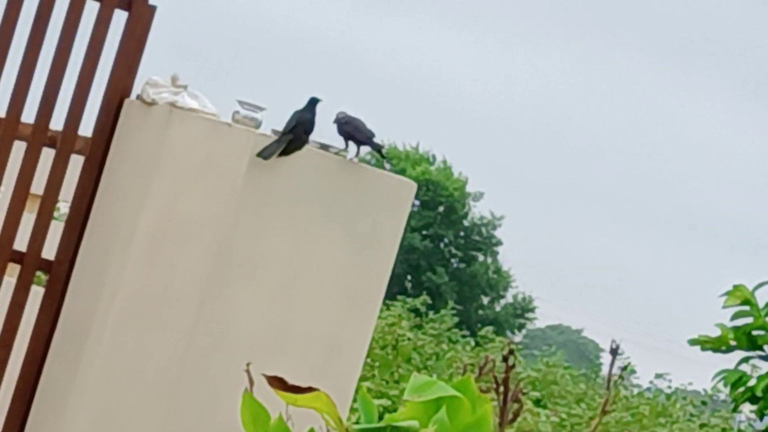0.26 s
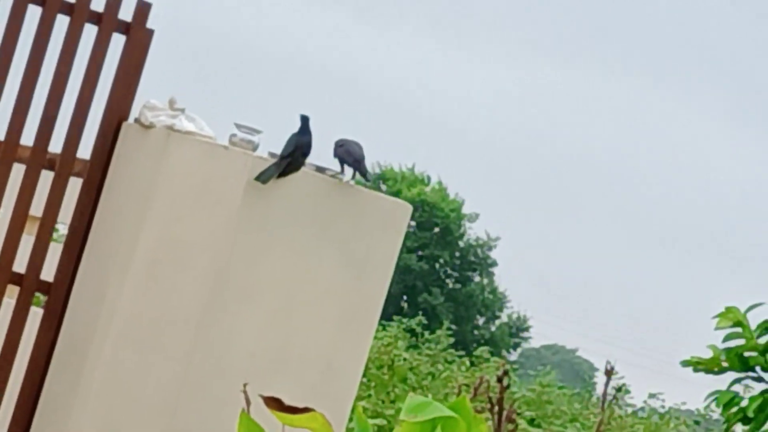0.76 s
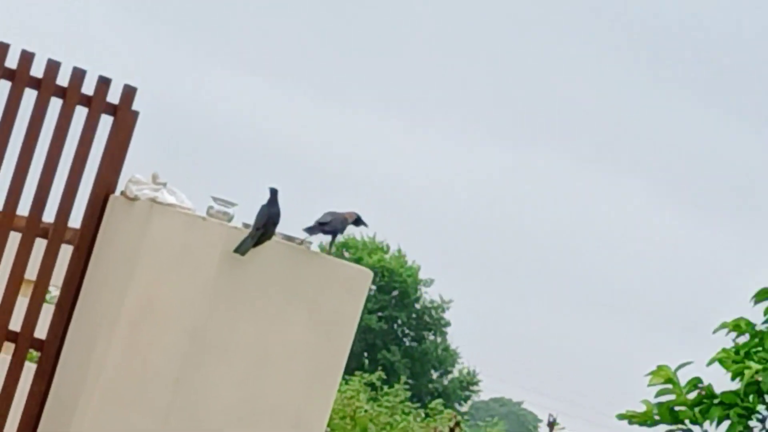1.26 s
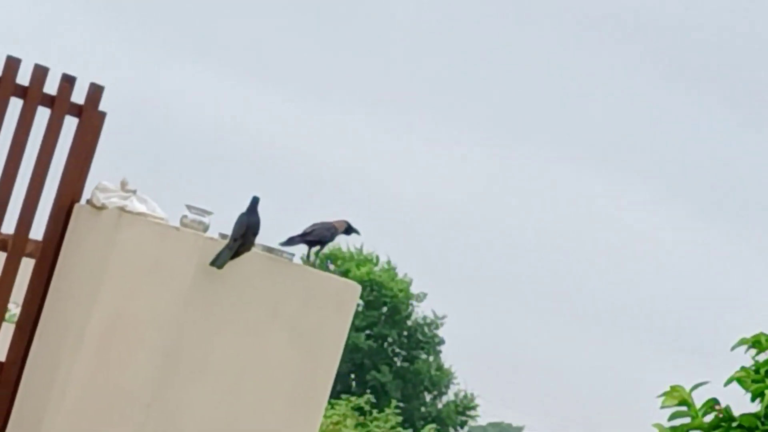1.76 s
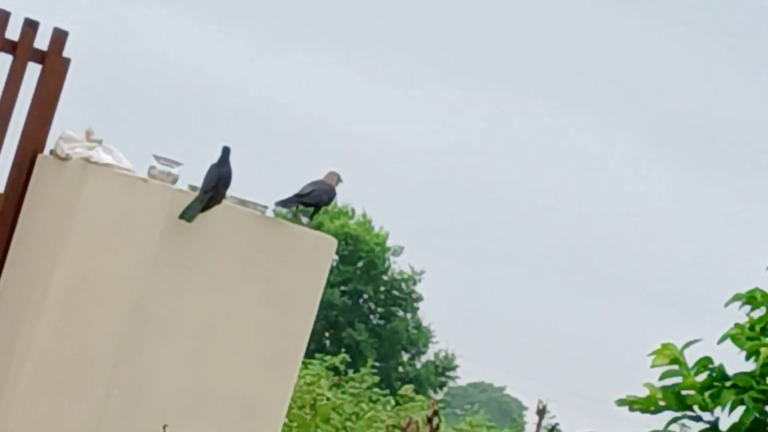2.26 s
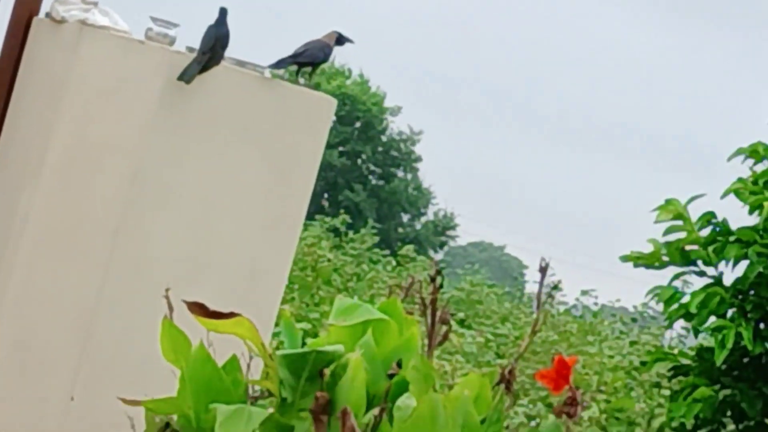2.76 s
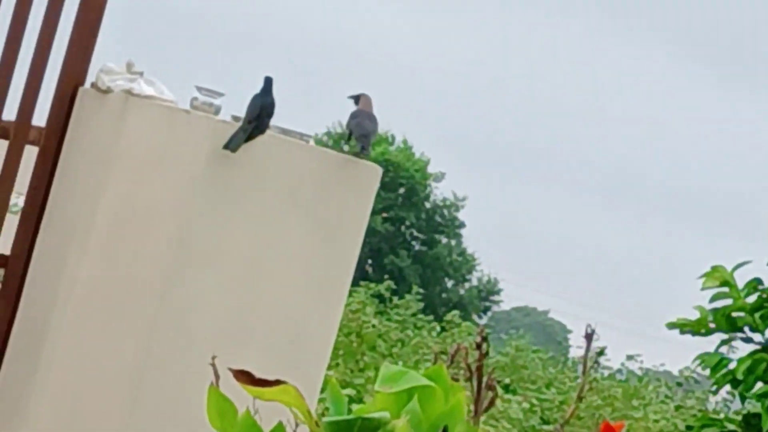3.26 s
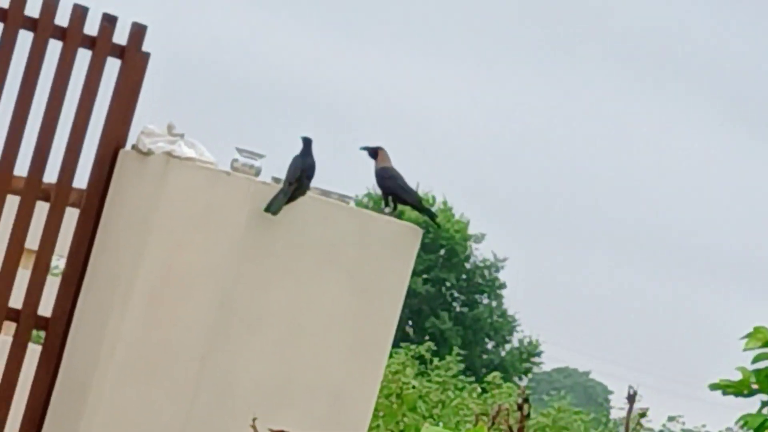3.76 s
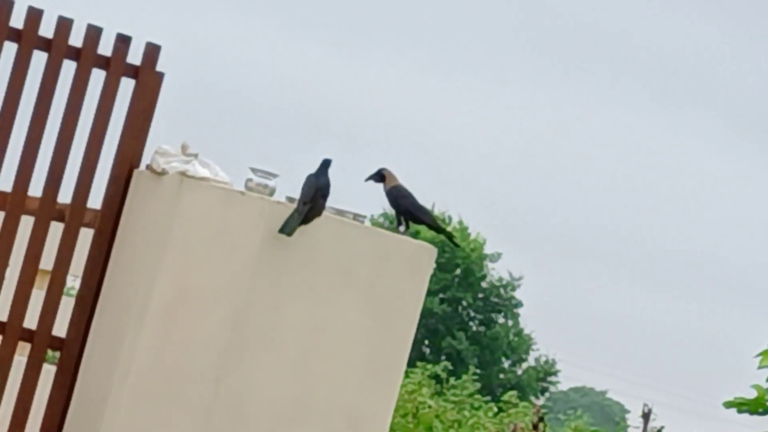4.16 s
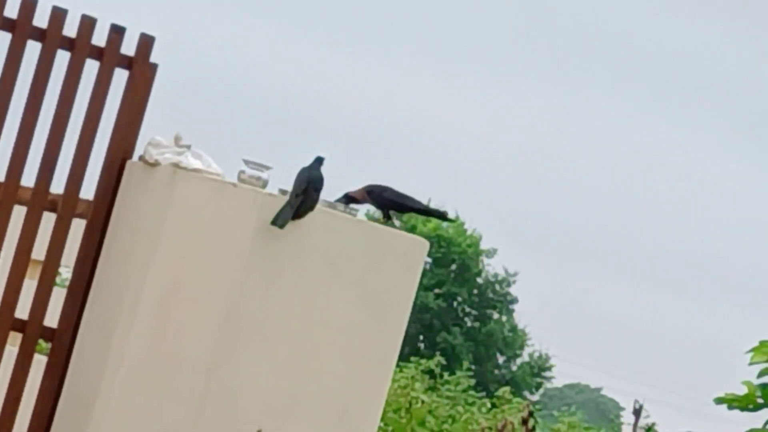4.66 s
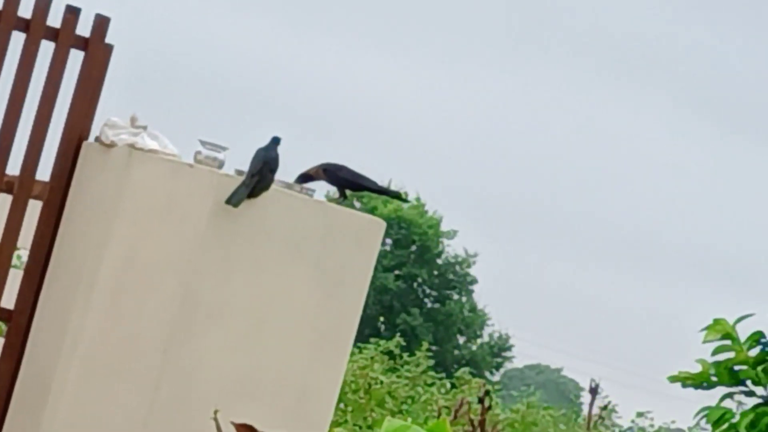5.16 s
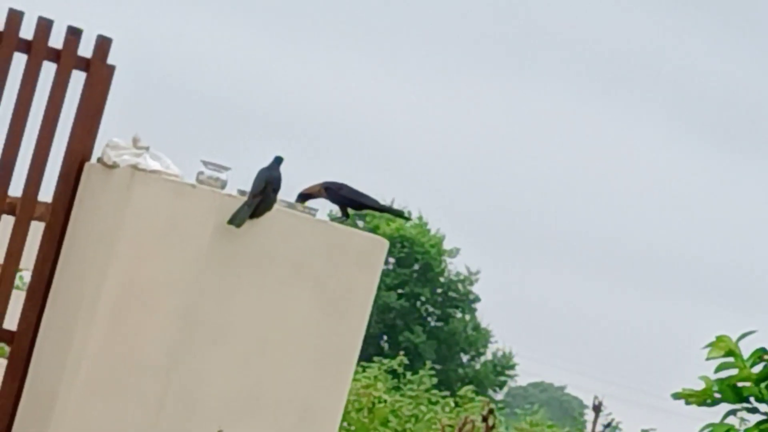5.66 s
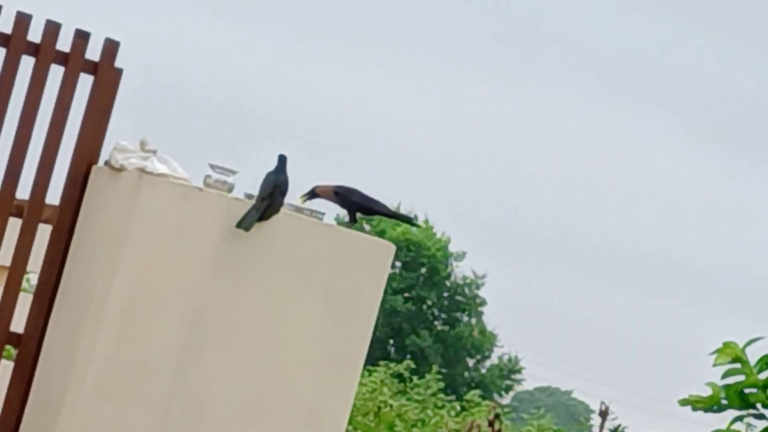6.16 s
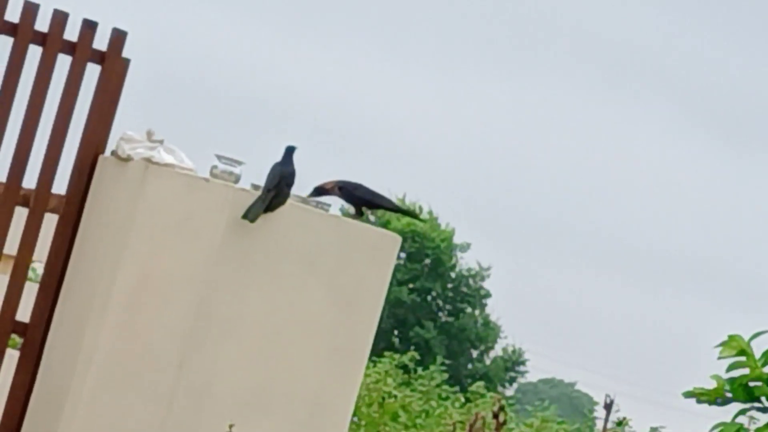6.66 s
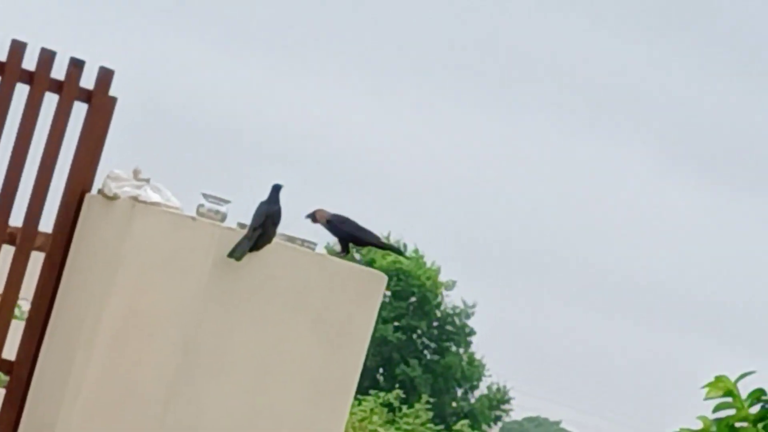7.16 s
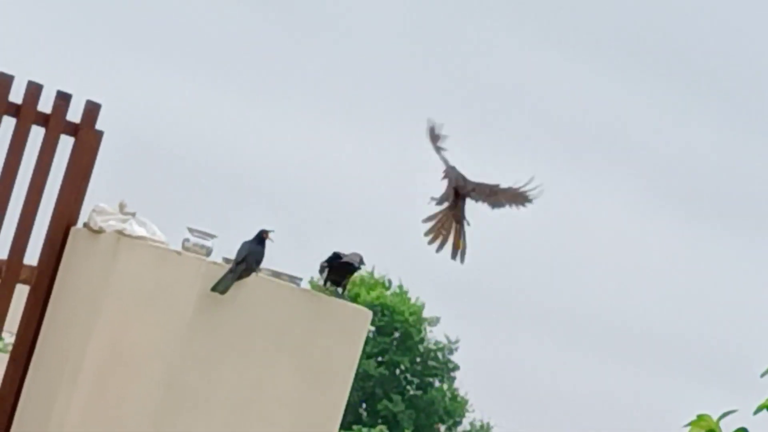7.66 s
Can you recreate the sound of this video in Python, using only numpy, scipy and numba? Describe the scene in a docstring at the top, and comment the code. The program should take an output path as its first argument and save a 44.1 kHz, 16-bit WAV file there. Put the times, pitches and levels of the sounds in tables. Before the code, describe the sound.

Outdoors, wind buffets the microphone in uneven low thumps while crows trade raspy and throaty caws. The calls bunch together midway as the wind drops, then thin out. A small bird gives one sharp chirp, and a last burst of hoarse cawing and short squawks follows. Faint whistles and thin insect trills sit in the distance, and the garden background dips whenever the crows and wind rest.

```python
"""Crows in a windy garden

Several crows caw, some throaty, some hoarse and hissing, often overlapping. Their breath makes skin in
the voice box slap, and the throat, mouth and bill ring with it. Gusts buffet the microphone with a low
rumble; small birds whistle and insects trill with their wings further off. The recorder's noise gate
turns the garden down whenever wind and crows rest."""
import sys
import numpy as np
from scipy import signal
from scipy.fft import rfft, irfft, next_fast_len
from scipy.io import wavfile
from scipy.ndimage import uniform_filter1d, minimum_filter1d
from numba import njit

SR = 44100
rng = np.random.default_rng(int(sys.argv[2]) if len(sys.argv) > 2 else 0)


def unload_wav(signal):
    """Save mono or channel-first audio to the path in sys.argv[1] as 16-bit WAV at rate SR, clipped to [-1, 1]."""
    wavfile.write(
        sys.argv[1],
        SR,
        np.round(np.clip(np.atleast_2d(signal).T, -1, 1) * 32767).astype(np.int16),
    )


N = 348831
T = np.arange(N) / SR

# tone of air fluttering on the microphone: f/Hz, level/dB
FLUTTER_SHAPE = [(60, -29.5), (150, 9), (290, 6.5), (430, -3), (620, -17), (1000, -37), (2000, -54),
                 (8000, -80.5)]


def voice_box(cycles, slap_share):
    """Thin skin slaps unevenly, every second slap weaker, and chops the stream of breath."""
    turn = cycles.astype(int)
    size = undb(1.2 * rng.standard_normal(512)[turn % 512] - 3 * (turn % 2))
    slaps = np.diff(turn, prepend=0) * size
    air = (2 + np.exp(-(cycles % 1) / 0.69)) * rng.standard_normal(SR)[:len(cycles)]
    return unit(slap_share * unit(slaps - slaps.mean()) + unit(air))


def throat_tone(source, cycles, hz, clear, overtone_gap_hz, overtone_share):
    """The throat rings at five times the slap rate; clear (0-1) favours pure tone over rough ringing."""
    # strong and weak cycles take turns, which adds a rough tone just above and below
    tone = np.sin(2 * np.pi * 5 * cycles) * (1 + 0.17 * np.cos(np.pi * cycles))
    # a neighbouring overtone beats against the first and roughens the caw
    overtone_hz = (hz + overtone_gap_hz) * (1 + 0.021 * wander(len(hz), 600))
    tone = np.sqrt(1 - overtone_share) * tone + np.sqrt(overtone_share) * sine(overtone_hz)
    ring = resonate(resonate(source, hz, 110.), hz, 970.)
    return steady(np.sqrt(clear) * unit(tone) + np.sqrt(1 - clear) * unit(ring))


def mouth_tone(source, glide, mouth_hz, gape):
    """The bill opens wide early in the call, so the mouth rings high and then slides down."""
    # tone of the open mouth: f/mouth_hz, level/dB
    mouth_shape = [(0.181, -42.5), (0.329, -14), (0.449, -18), (0.679, -0.5), (0.998, -3), (1.222, -21.5),
                   (1.797, -25.5), (2.9, -40), (3.999, -38), (5.5, -40)]
    t = np.arange(len(source)) / SR
    opening = gape * np.exp(-((t - .045) / 0.044) ** 2)
    centre = mouth_hz * (1 + opening) * glide ** 0.5
    ring = 0.39 * (1 + 1.8 * opening) * resonances(source, [(0.97, 980, 0)], centre)
    return steady(unit(colour(source, mouth_shape, mouth_hz)) + ring) * (1 + 1.1 * opening)


def caw(hz, attack, release, clear, overtone_gap_hz, overtone_share, throat_db, mouth_hz, gape,
        mouth_db, rasp_db, hiss_db, pipe_db, pipe_hz=5000, throb_db=0):
    """One caw: rough pulses ring the throat, mouth, bill and windpipe, which glide with the pitch hz."""
    # where the bill rings at the top of the glide: f/Hz, width/Hz, level/dB
    bill_rings = [(2120, 2700, 3.5), (3184, 1400, 4.5), (3797, 620, -1), (4486, 700, -4.5),
                  (4973, 230, -12.5)]
    # where the windpipe rings: f/pipe_hz, width/Hz, level/dB
    pipe_rings = [(1, 1000, -2), (1.72, 1500, -12.5), (2.07, 1400, -14.5)]
    # tone of the hissing breath: f/Hz, level/dB
    hiss_shape = [(600, -20), (2200, -3), (3500, 12.5), (4600, 7), (7000, 5), (9500, -2.5), (11500, -10.5),
                  (15000, -19)]
    n, glide = len(hz), hz / hz.max()
    jitter = .03 * (1.1 - clear) * wander(n, 600)  # a clear voice is steadier
    cycles = np.cumsum(hz * (1 + jitter)) / 5 / SR  # running count of slaps
    source = voice_box(cycles, slap_share=0.55)
    throat = throat_tone(source, cycles, hz, clear, overtone_gap_hz, overtone_share)
    mouth = mouth_tone(source, glide, mouth_hz, gape)
    rasp = steady(resonances(voice_box(cycles, slap_share=.35), bill_rings, glide ** 0.33))
    rasp *= undb(2 * wander(n, 24))
    pipe = unit(resonances(voice_box(cycles, slap_share=0.22), pipe_rings, pipe_hz * glide ** 0.54))
    hiss = unit(colour(voice_box(cycles, slap_share=0.056), hiss_shape))
    effort = swell(np.arange(n) / SR, n / SR, attack, release)
    throb = undb(throb_db * np.tanh(wander(n, rate=70)))
    voice = undb(throat_db) * throat * throb ** .5
    voice += throb * (undb(mouth_db) * mouth + undb(rasp_db) * rasp)
    # hiss grows faster with effort than the voice does; the windpipe rings from the start
    return effort * voice + effort ** 1.5 * undb(hiss_db) * hiss + effort ** 0.32 * undb(pipe_db) * pipe


def arched(length, top_hz, arch, crest):
    """Pitch that climbs to its top, at the share crest of the length, then sags a little."""
    progress = np.arange(int(length * SR)) / SR / length
    past_crest = np.interp(progress, [0, crest, 1], [-1, 0, 1])
    return top_hz * (1 - arch * np.abs(past_crest) ** 1.8 * np.where(past_crest < 0, 1.15, .44))


def bounced(voice, lag_s, share=0.24):
    """A call and its bounce off the wall, which makes it sound hollow."""
    lag = int(lag_s * SR)
    return (np.pad(voice, (0, lag)) + share * np.pad(voice, (lag, 0))) / (1 + share ** 2)


def hoarse_caws():
    """Breathy, hissing caws that share one rough voice."""
    # the caws: t/s, length/s, attack/s, top pitch/Hz, arch/share, throat/dB, mouth/dB, rasp/dB, hiss/dB
    calls = [ (0.847, 0.45, 0.1, 1483, 0.16, -37.5, -67, -40, -37.5),
             (1.887, 0.47, 0.2, 1520, 0.095, -33.5, -52, -35.5, -31),
             (2.871, 0.33, 0.13, 1483, 0.17, -37.5, -45.5, -46.5, -73),
             (3.154, 0.35, 0.14, 1467, 0.19, -40.5, -62, -39, -41),
             (4.222, 0.39, 0.15, 1358, .25, -40.5, -45, -45.5, -75),
             (5.001, 0.44, 0.082, 1490, 0.056, -37, -59.5, -41, -42.5),
             (7.49, 0.55, 0.2, 1529, 0.25, -39.5, -46.5, -38.5, -63),
             (7.58, 0.41, 0.2, 1495, 0.097, -45, -59, -45, -40.5)]
    out = np.zeros(N)
    for start, length, attack, hz, arch, throat_db, mouth_db, rasp_db, hiss_db in calls:
        voice = caw(arched(length, hz, arch, crest=.5), attack, release=0.13, clear=.25,
                    overtone_gap_hz=0, overtone_share=0, throat_db=throat_db, mouth_hz=3550, gape=.04,
                    mouth_db=mouth_db, rasp_db=rasp_db, hiss_db=hiss_db, pipe_db=rasp_db - 24)
        add(out, start, bounced(voice, lag_s=0.0046))
    return out


def throaty_caws():
    """Full, throbbing caws from several perches, each with its own voice."""
    # the caws: t/s, length/s, loudest point/share of length, clearness/0-1, gap to next overtone/Hz,
    # that overtone/share, throat/dB, mouth/Hz, gape/share, mouth/dB, rasp/dB, windpipe/Hz
    calls = [ (1.577, 0.52, 0.44, 0.51, -180, .5, -27, 2520, 0.43, -31, -55.5, 5400),
             (4.403, 0.43, 0.39, 0.79, 188, 0.23, -29.5, 2120, 0.043, -35, -59.5, 5800),
             (4.887, 0.44, 0.48, 0.43, -290, 0.055, -29, 2520, 0.4, -33, -56.5, 5200),
             (5.524, 0.31, 0.41, 0.7, -5, 0.046, -42.5, 3467, 0.014, -54, -57, 5370),
             (6.404, 0.36, 0.65, .55, 150, 0, -33.5, 2320, 0.34, -36, -56, 5860)]
    # the throat's pitch, one curve for each caw: t/s, f/Hz
    pitches = [
        [(1.58, 1246), (1.65, 1398), (1.78, 1572), (2.0, 1438), (2.09, 1310)],
        [(4.47, 1176), (4.56, 1490), (4.73, 1284), (4.78, 1120)],
        [(4.89, 1301), (4.95, 1506), (5.13, 1556), (5.34, 1416)],
        [(5.53, 1150), (5.66, 1404), (5.79, 1325)],
        [(6.42, 1079), (6.65, 1248), (6.78, 1087)],
    ]
    out = np.zeros(N)
    for (start, length, crest, *throat_and_mouth, rasp_db, pipe_hz), pitch in zip(calls, pitches):
        hz = curve(pitch)[int(start * SR):int((start + length) * SR)]
        attack, release = crest * length, 0.86 * (1 - crest) * length
        voice = caw(hz, attack, release, *throat_and_mouth, rasp_db, hiss_db=rasp_db - 14.5,
                    pipe_db=rasp_db - 6, pipe_hz=pipe_hz, throb_db=2.5)
        add(out, start, bounced(voice, lag_s=.0022))
    return out


def squawks():
    """Short, bright squawks at the end, as another crow swoops in."""
    # the squawks: t/s, mouth level/dB
    calls = [(7.584, -34), (7.689, -31.5), (7.79, -35.5)]
    hz = arched(length=0.093, top_hz=1420, arch=0.0508, crest=0.76)
    out = np.zeros(N)
    for start, db in calls:
        voice = caw(hz, attack=0.027, release=0.033, clear=0.59, overtone_gap_hz=0, overtone_share=0,
                    throat_db=db - 14, mouth_hz=4180, gape=0, mouth_db=db,
                    rasp_db=db - 9, hiss_db=db - 17, pipe_db=db - 31)
        add(out, start, voice)
    return out


def wind_level():
    """Strength of the wind in dB: each gust rises, holds and dies away over the breeze."""
    # the breeze on the microphone: t/s, level/dB
    breeze = [(0, -73), (1.1, -47), (2.75, -27.5), (3.3, -38.5), (4.1, -32), (4.6, -44), (5.0, -42.5),
              (5.12, -55), (5.7, -54), (6.52, -54), (6.7, -31.5), (7.9, -50)]
    # gusts on top of it: t/s, length/s, level/dB
    gusts = [(0.25, 0.25, -47), (0.509, 0.4, -31), (1.191, 0.24, -26), (1.53, 0.91, -20), (1.85, 0.29, -13),
             (2.481, 0.23, -23.5), (3.458, 0.17, -24), (5.92, 0.21, -49), (6.595, 0.61, -31.5),
             (6.742, 0.11, -22.5), (7.448, 0.13, -28), (7.69, 0.12, -34), (7.877, 0.13, -20)]
    power = undb(curve(breeze)) ** 2
    for start, length, db in gusts:
        power += (undb(db) * swell(T - start, length, attack=.05, release=.06)) ** 2
    return 10 * np.log10(power)


def buffets(pulse_s=0.0082, db_per_octave=24.5):
    """Single knocks of air on the microphone; harder ones are brighter."""
    # the knocks: t/s, strength/dB
    knocks = [(0.62, -24), (1.249, -26.5), (1.804, -15), (1.904, -10), (1.951, -14), (2.026, -12),
              (2.259, -15.5), (2.349, -14.5), (2.535, -21.5), (2.647, -18), (2.662, -20), (3.535, -27.5),
              (4.248, -36), (6.775, -24), (7.064, -23.5), (7.491, -32)]
    t = np.arange(SR // 10) / SR
    pulse = t / pulse_s * np.exp(1 - 2 * t / pulse_s)
    out = np.zeros(N)
    for start, db in knocks:
        brightness = 2 ** ((db + 11) / db_per_octave)
        burst = steady(colour(rng.standard_normal(len(t)), FLUTTER_SHAPE, brightness), size=400)
        add(out, start, undb(db + 7) * burst * pulse)
    return out


def wind(surge_db=5.5, ceiling=0.5):
    """Swirls of air thump the microphone; a harder gust makes them quicker and more fluttery."""
    # tone of the rumble, shifted down for soft wind and up for hard wind: f/Hz, level/dB
    rumble_shape = [(20, -36.5), (45, -16.5), (65, 1), (110, 1.5), (145, -4), (200, -12), (300, -28.5),
                    (500, -65.5), (1000, -73), (4000, -78.5)]
    gust_db = wind_level() + surge_db * np.tanh(wander(N, rate=19))
    force = np.clip((gust_db + 44) / 30, 0, 1)
    noise = rng.standard_normal(N)
    soft, hard = colour(noise, rumble_shape, 0.88), colour(noise, rumble_shape, 1.238)
    swirls = steady((1 - force) * soft + force * hard, size=2200)
    flutter = steady(colour(rng.standard_normal(N) * swirls ** 2, FLUTTER_SHAPE), size=4000)
    out = undb(gust_db - 1) * (swirls + undb(-27.5 + 22.9 * force ** 2) * flutter) + buffets()
    return ceiling * np.tanh(out / ceiling)  # the largest thumps flatten


def note(length, from_hz, to_hz, db, scratch=0.011):
    """A small bird's note: a quick glide, made scratchy by a fast wobble in pitch."""
    t = np.arange(int(length * SR)) / SR
    hz = to_hz + (from_hz - to_hz) * (1 - t / length) ** 1.1
    hz *= 1 + scratch * wander(len(t), 1700)
    return undb(db) * unit(sine(hz) * swell(t, length, 0.52 * length, 0.7 * length))


def whistle(length, hz, fall_per_s, db):
    """A note that starts above the pitch hz and ends below it."""
    fall = np.exp(fall_per_s * length / 2)
    return note(length, hz * fall, hz / fall, db)


def songbirds(far_count=22):
    """Falling whistles in the trees, fainter ones at random behind them, and scratchy chirps."""
    # the nearer whistles: t/s, length/s, f/Hz, fall/share of pitch per s, level/dB
    whistles = [(.275, .11, 2830, 2.4, -70), (1.402, .04, 4840, 3, -77), (0.611, 0.16, 3470, 1.1, -67.5),
                (0.753, 0.056, 2420, 3, -62.5), (0.788, 0.09, 3880, 3.2, -71),
                (1.306, 0.17, 2350, 2.2, -64.5), (2.303, 0.073, 2680, 0.57, -56),
                (2.542, 0.041, 2280, 4.2, -62), (2.726, 0.066, 2710, 0.76, -61.5),
                (2.817, 0.082, 4120, 1, -66.5), (6.021, 0.095, 3980, 0.25, -69.5),
                (7.064, .1, 3270, 2.7, -64)]
    # a sharp chirp close by that ends in a held whistle, then a faint scratchy call:
    # t/s, length/s, from/Hz, to/Hz, level/dB, scratch/share
    chirps = [(6.891, 0.035, 3300, 4660, -52, 0.14), (6.905, 0.049, 5920, 6820, -42, 0.072),
              (6.915, 0.13, 6170, 6060, -52, 0.0058), (7.011, 0.029, 6000, 6560, -52.5, 0.073),
              (7.333, 0.24, 3750, 3070, -63, 0.13)]
    out = np.zeros(N)
    for start, *row in whistles:
        add(out, start, whistle(*row))
    for when, length, pitch, size in rng.random((far_count, 4)):
        hz = 2150 * 2 ** (0.81 * (pitch - .5))
        add(out, when * T[-1], whistle(0.14 * (.5 + length), hz, fall_per_s=2.6, db=-73 + 6 * size))
    for start, *row in chirps:
        add(out, start, note(*row))
    return out


def insects(stroke_hz=98, width_hz=350.):
    """Quick wing strokes ring one high pitch in short trills."""
    # the trills: t/s, length/s, f/Hz, level/dB
    trills = [(0.501, 0.36, 6970, -67), (3.442, 0.16, 6780, -63.5), (6.956, 0.39, 8830, -67),
              (7.076, 0.35, 6850, -63)]
    out = np.zeros(N)
    for start, length, hz, db in trills:
        t = np.arange(int(length * SR)) / SR
        strokes = np.exp(-(t * stroke_hz % 1) / 0.3) * rng.standard_normal(N)[:len(t)]
        centre = np.full(len(t), float(hz))
        ring = resonate(resonate(strokes, centre, width_hz), centre, 2 * width_hz)
        add(out, start, undb(db) * unit(ring) * swell(t, length, attack=0.037, release=0.093))
    return out


def garden(level_db=-57.5, cricket_hz=7100.):
    """Far leaves and town, with a thin chorus of crickets."""
    # tone of the distant garden: f/Hz, level/dB
    garden_shape = [(30, -11), (100, 18), (250, 3), (600, 3), (1200, -1), (2600, -2), (4500, -11.5),
                    (6000, -15.5), (9500, -17), (15000, -21)]
    air = unit(colour(rng.standard_normal(N), garden_shape)) * undb(0.27 * wander(N, 26))
    centre = np.full(N, cricket_hz)
    crickets = unit(resonate(resonate(rng.standard_normal(N), centre, 450.), centre, 700.))
    return undb(level_db) * (air + undb(-16 + 1.9 * wander(N, 0.86)) * crickets)


def echoes(x, fade_s, level_db, low_hz, high_hz):
    """Many scattered echoes blur into a tail that drops 60 dB in fade_s."""
    t = np.arange(SR) / SR
    tail = rng.standard_normal(SR) * undb(-60 * t / fade_s) * np.clip(20 * t / fade_s, 0, 1)
    band = signal.butter(2, [low_hz, high_hz], "bandpass", fs=SR, output="sos")
    return undb(level_db) * signal.fftconvolve(x, signal.sosfilt(band, tail / np.linalg.norm(tail)))[:N]


def gate(x, open_db=-49, knee_db=7, depth_db=20, window_s=.06, hold_s=0.112):
    """Noise gate: turns everything down when wind and crows fall quiet for longer than hold_s."""
    # the gate listens mostly to the bass: f/Hz, level/dB
    hearing = [(300, -4), (1200, -11.5)]
    size, hold = int(window_s * SR), int(hold_s * SR)
    power = np.abs(uniform_filter1d(colour(x, hearing) ** 2, size))
    quiet = np.clip((open_db - 10 * np.log10(power + 1e-12)) / knee_db, 0, 1)
    shut = -minimum_filter1d(-minimum_filter1d(quiet, hold), hold)  # skip short pauses
    return x * undb(-depth_db * uniform_filter1d(shut, size // 2))


@njit
def resonate(x, hz, width):
    """Let x ring in a band, width Hz wide, around the moving pitch hz."""
    y, band, low = np.empty(len(x)), 0., 0.
    for i in range(len(x)):
        step, damping = np.tan(np.pi * hz[i] / SR), width / hz[i]
        swing = (band + step * (x[i] - low)) / (1 + step * (step + damping))
        band, low, y[i] = 2 * swing - band, low + 2 * step * swing, damping * swing
    return y


def resonances(x, rows, scale):
    """Add up ringing bands, given as (f, width/Hz, level/dB), each centred on f times scale."""
    out = np.zeros(len(x))
    for f, width, db in rows:
        once = resonate(x, f * scale, float(width))
        out += undb(db) * unit(resonate(once, f * scale, float(width)))
    return out


def colour(x, points, scale=1):
    """Shape the tone by (f/Hz, level/dB) points; scale multiplies their frequencies."""
    hz, db = np.transpose(points)
    size = next_fast_len(len(x) + 2048)
    f = np.maximum(np.fft.rfftfreq(size, 1 / SR), 1)
    gain = undb(np.interp(np.log(f), np.log(hz * scale), db))
    return irfft(rfft(x, size) * gain, size)[:len(x)]


def wander(n, rate):
    """A random drift, about 1 in size, that turns rate times a second."""
    knots = rng.standard_normal(4096)
    return 1.2 * np.interp(np.arange(n) * rate / SR % len(knots), np.arange(len(knots)), knots)


def swell(t, length, attack, release):
    """Rise for attack seconds, hold, then fall for release seconds."""
    rise = np.sin(np.pi / 2 * np.clip(t / attack, 0, 1)) ** (1 + 0.5 * attack)
    return rise * np.sin(np.pi / 2 * np.clip((length - t) / release, 0, 1)) ** 2


def sine(hz):
    """A pure tone that follows the pitch hz."""
    return np.sin(2 * np.pi * np.cumsum(hz) / SR)


def steady(x, size=900):
    """Even out the loudness over stretches of size samples."""
    return x / np.sqrt(uniform_filter1d(x ** 2, size) + 1e-12)


def undb(db):
    """Turn decibels into a multiplier."""
    return 10 ** (np.asarray(db) / 20)


def unit(x):
    """Scale to an average power of 1."""
    return x / np.sqrt(np.mean(x ** 2) + 1e-18)


def curve(rows):
    """Join (t/s, value) rows by straight lines."""
    return np.interp(T, *np.transpose(rows))


def add(out, start, x):
    """Mix x into out from start seconds on."""
    i = int(start * SR)
    out[i:i + len(x)] += x[:N - i]


def scene():
    """Birds echo off near railings, which scatter the treble, and far trees; insects and wind join in."""
    caws = hoarse_caws() + throaty_caws() + squawks()
    small_birds = songbirds()
    railings = echoes(caws + small_birds, fade_s=0.054, level_db=-2.5, low_hz=2420, high_hz=13400)
    # the small birds sit further off, so more of their sound comes by way of the trees
    trees = echoes(caws + 4 * small_birds, fade_s=0.57, level_db=-15.5, low_hz=1630, high_hz=4700)
    return (caws + small_birds + railings + trees + insects() + garden() + wind())[None]


def record(dry, top_hz=15500):
    """The microphone's opening rings in the high treble; a gate lowers the lulls; the top is cut."""
    # tone of the microphone: f/Hz, level/dB
    mic_shape = [(30, 2.5), (6900, -6), (8000, -7), (9400, 5.5), (10400, -3.5), (12500, -8), (15500, -12.5)]
    sound = gate(colour(dry[0], mic_shape))[None]
    return signal.sosfilt(signal.ellip(10, .2, 70, top_hz, fs=SR, output="sos"), sound)


dry = scene()
out = record(dry)
unload_wav(out)
```